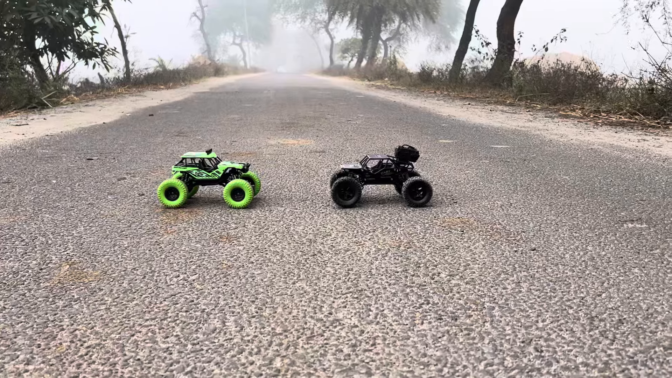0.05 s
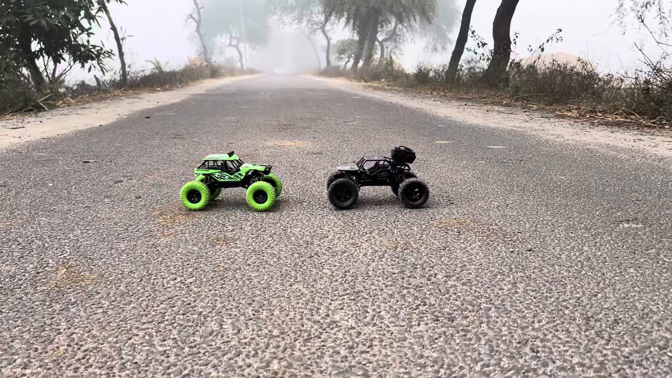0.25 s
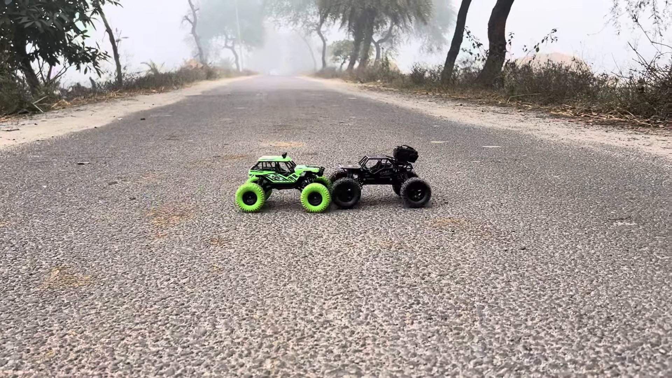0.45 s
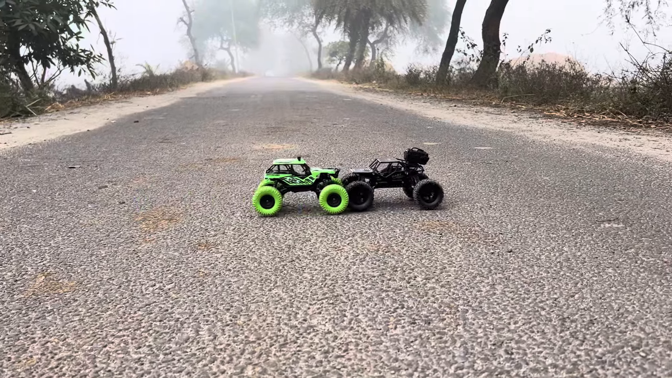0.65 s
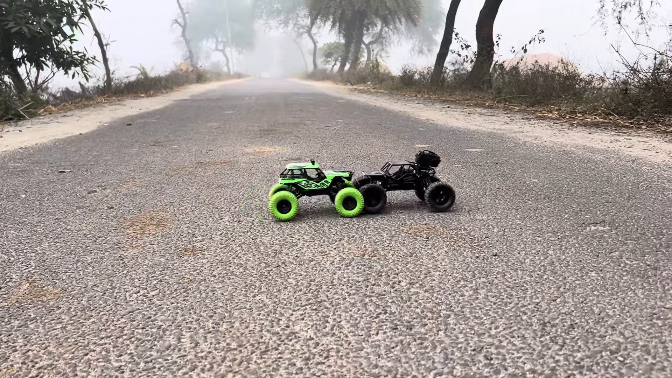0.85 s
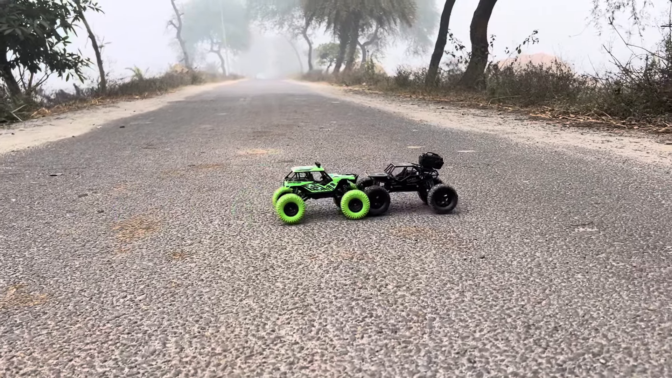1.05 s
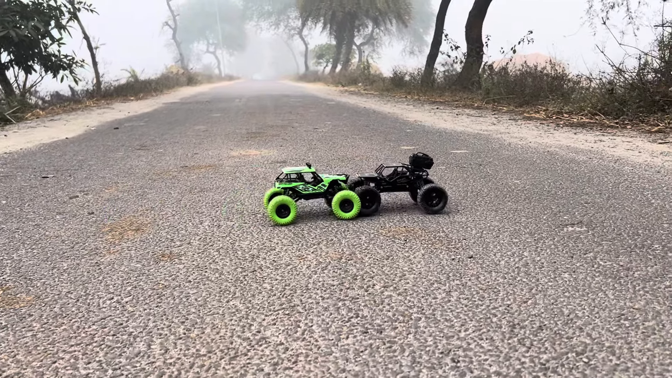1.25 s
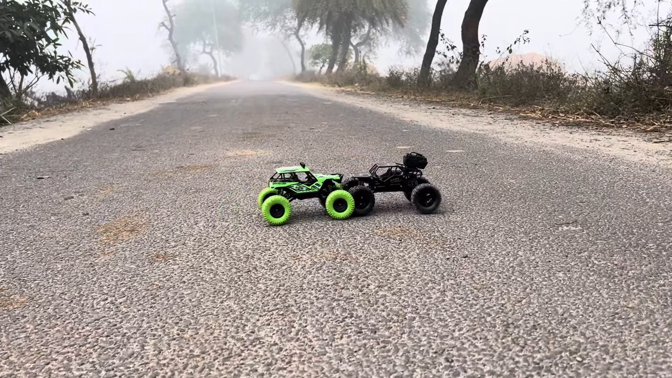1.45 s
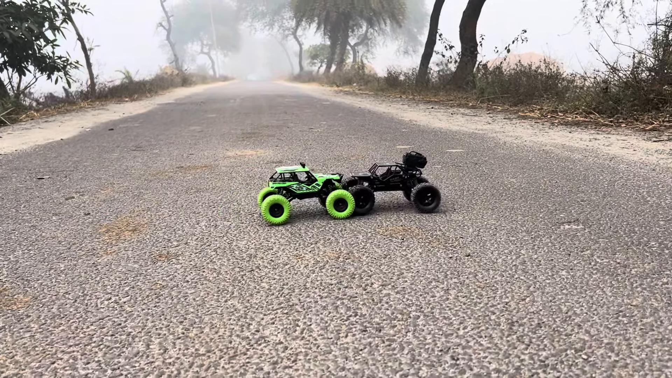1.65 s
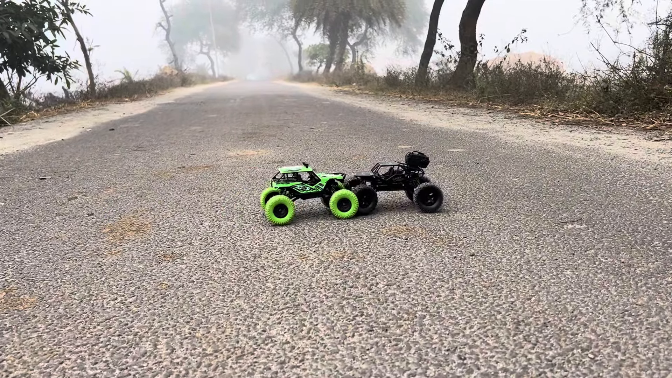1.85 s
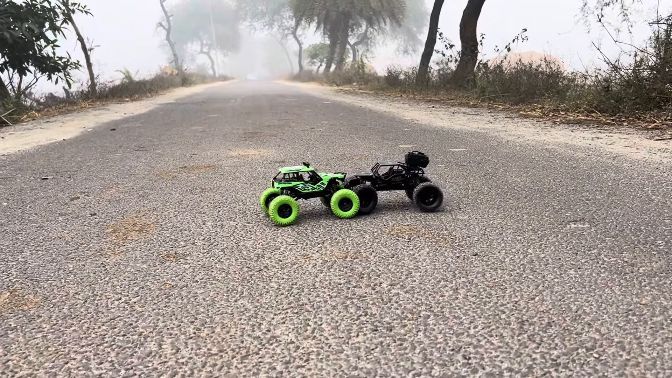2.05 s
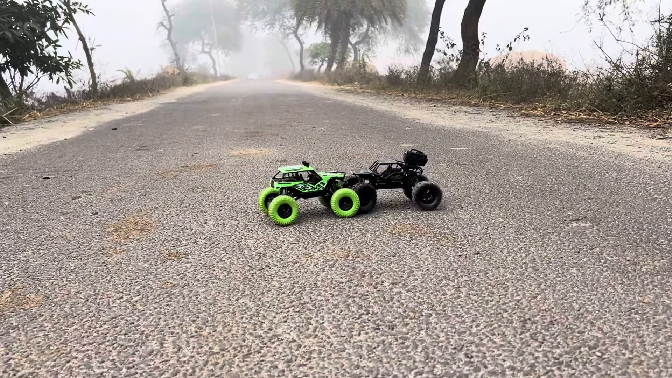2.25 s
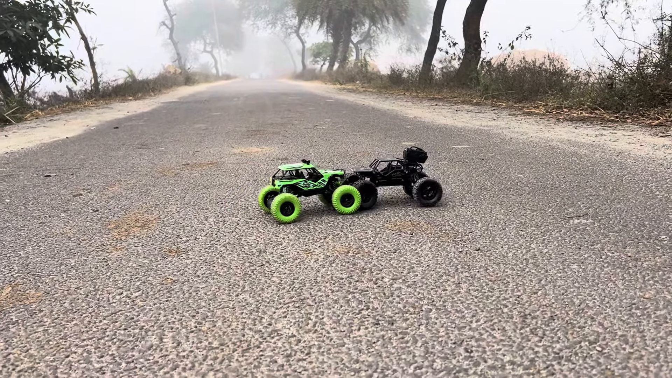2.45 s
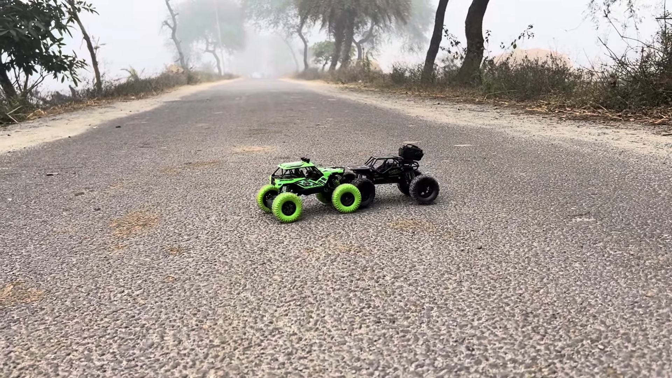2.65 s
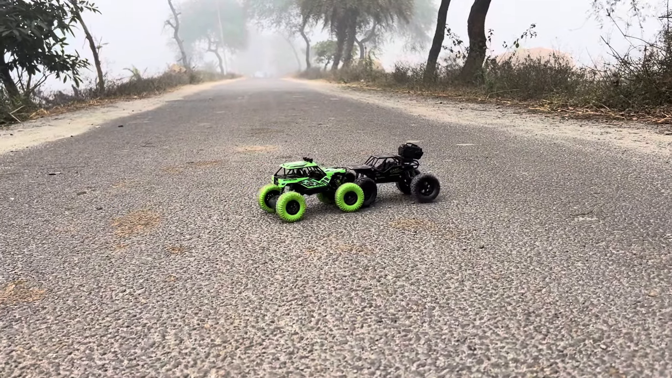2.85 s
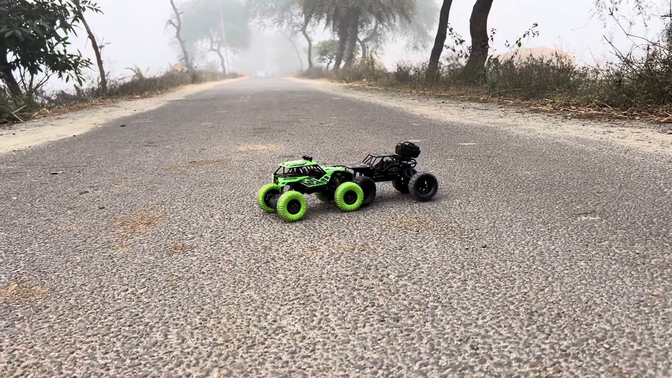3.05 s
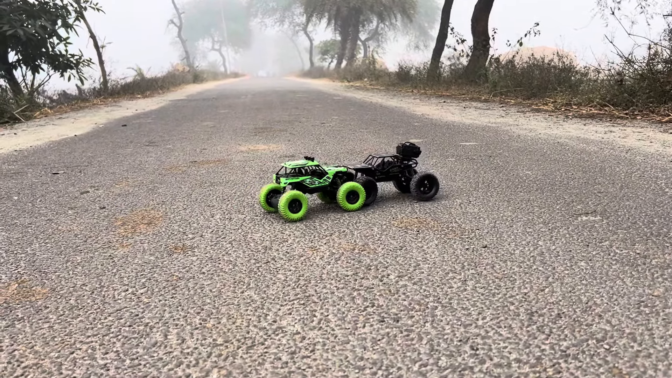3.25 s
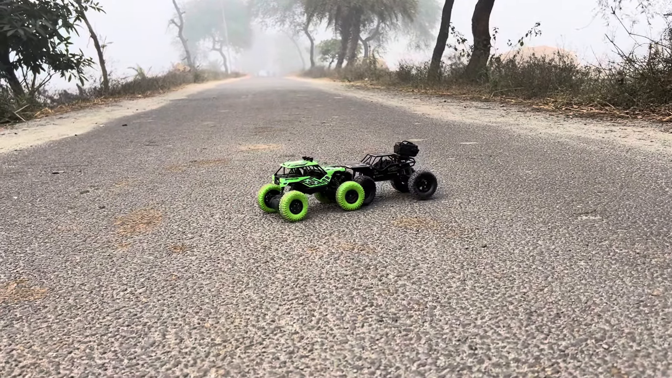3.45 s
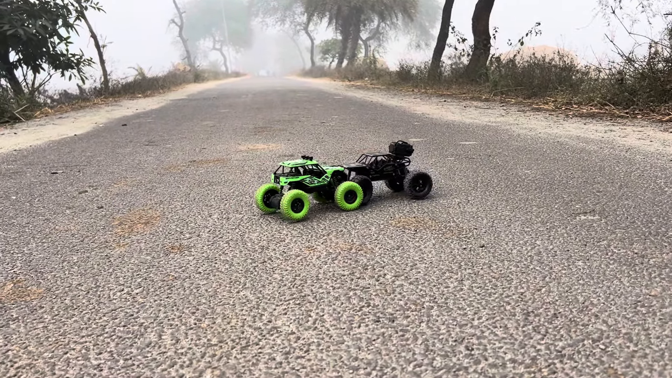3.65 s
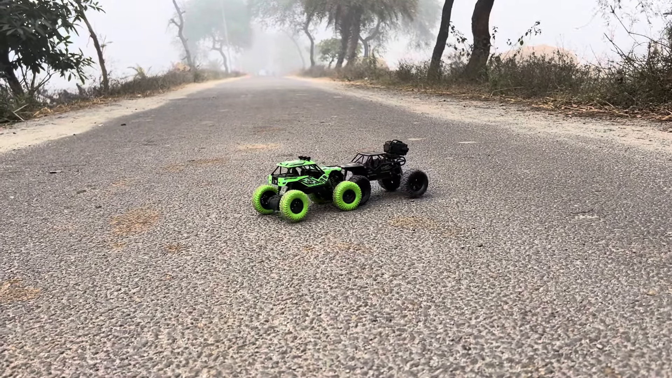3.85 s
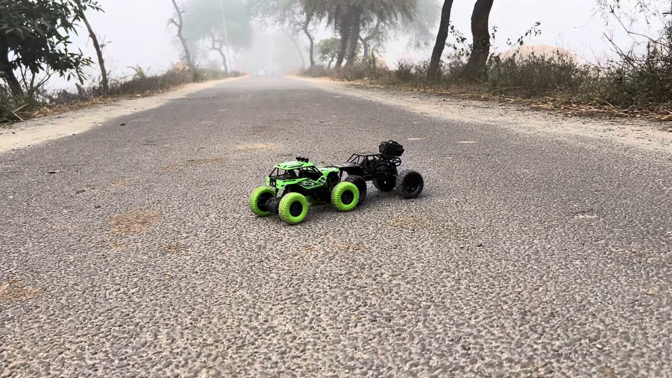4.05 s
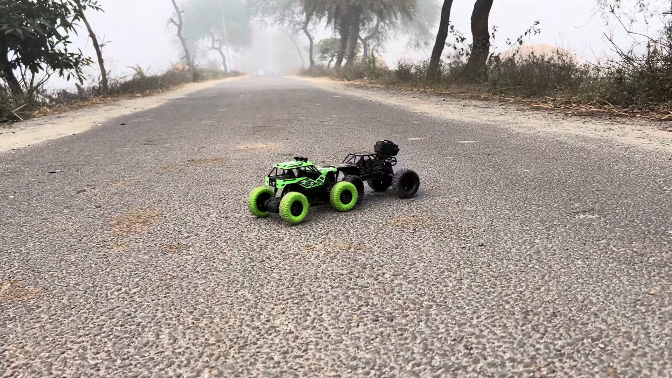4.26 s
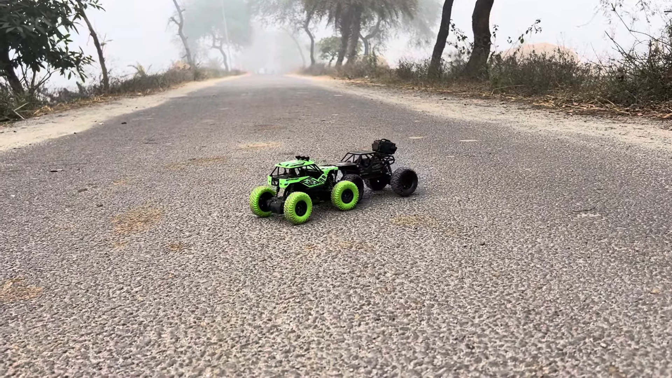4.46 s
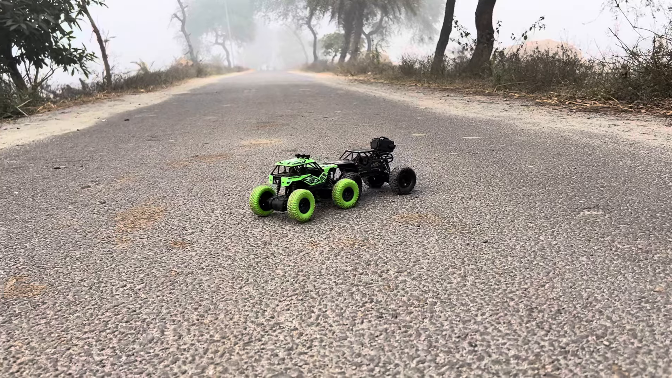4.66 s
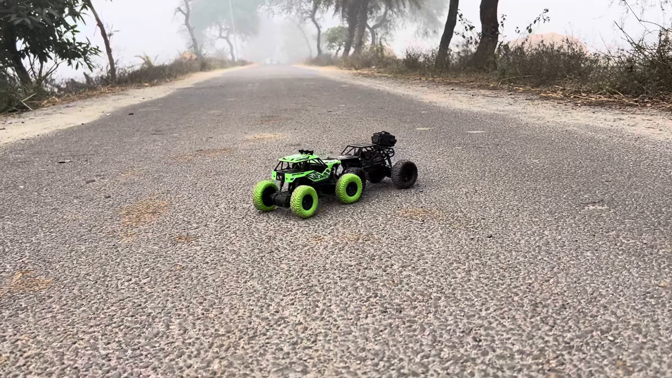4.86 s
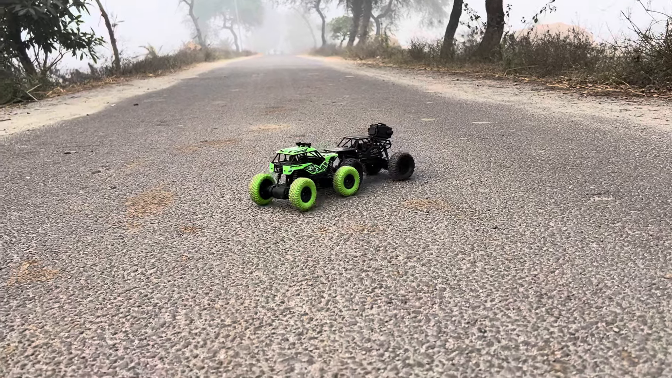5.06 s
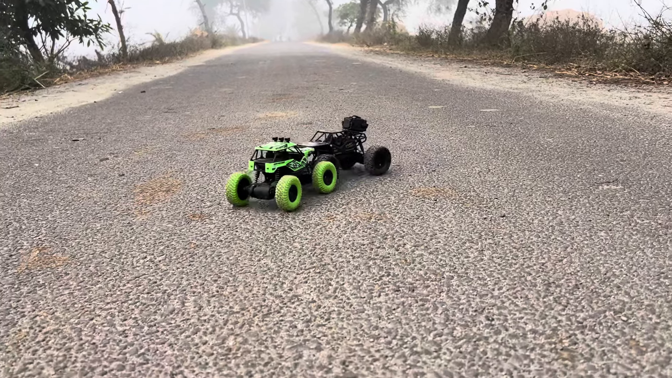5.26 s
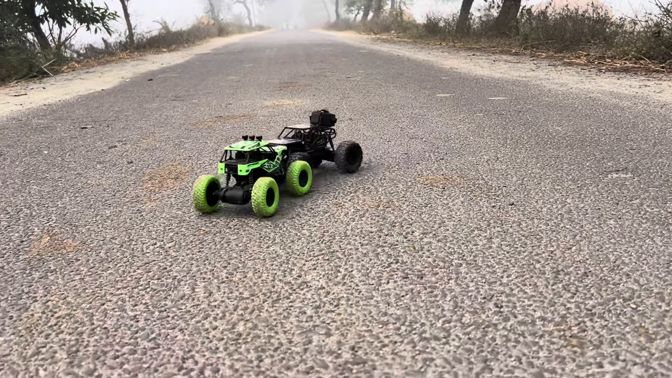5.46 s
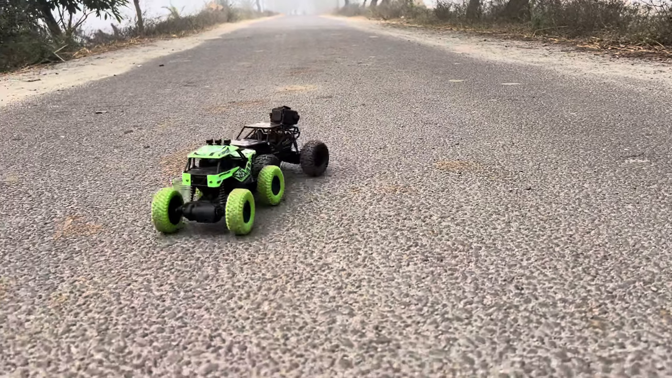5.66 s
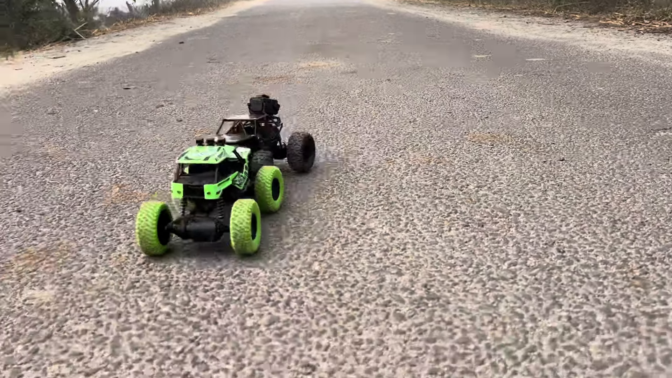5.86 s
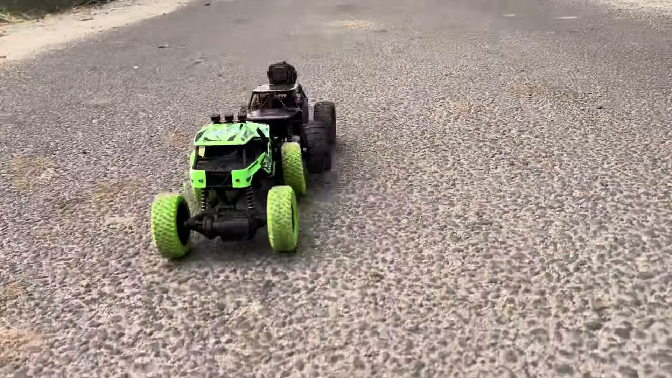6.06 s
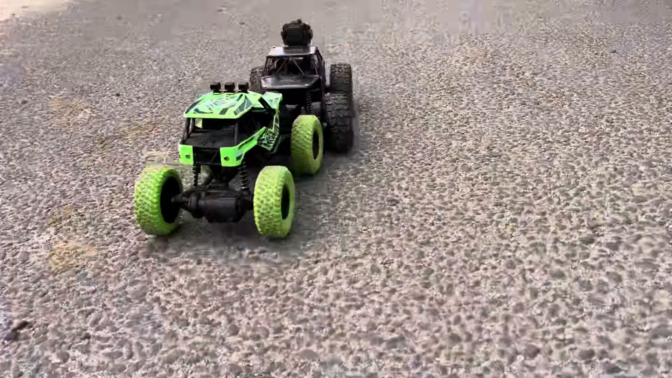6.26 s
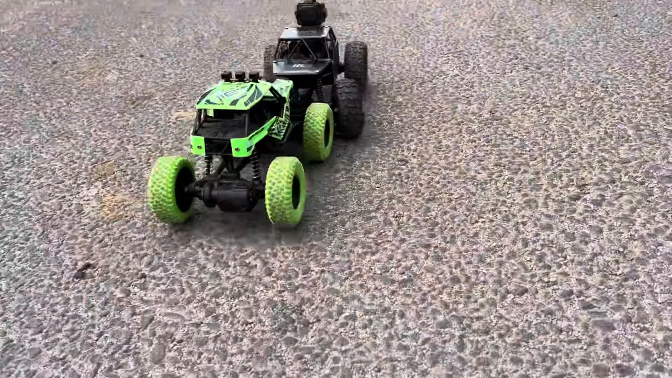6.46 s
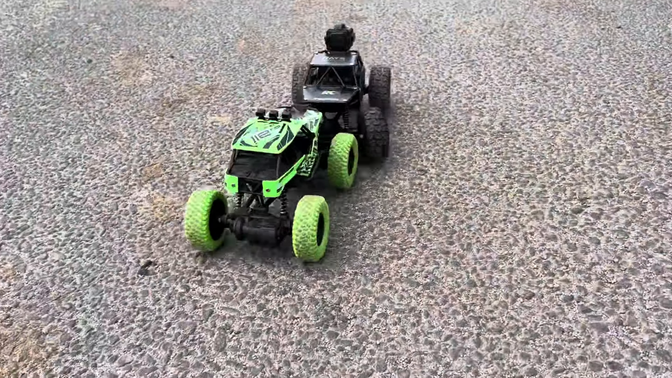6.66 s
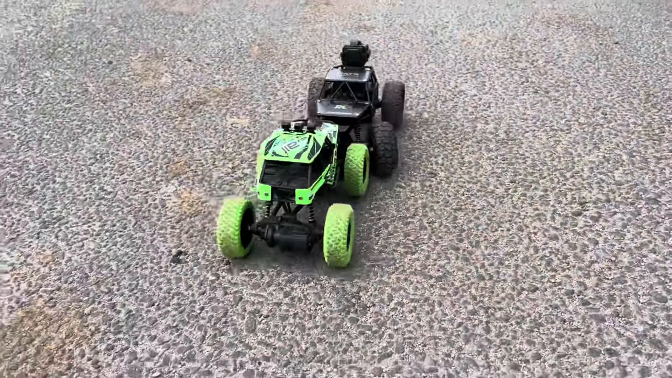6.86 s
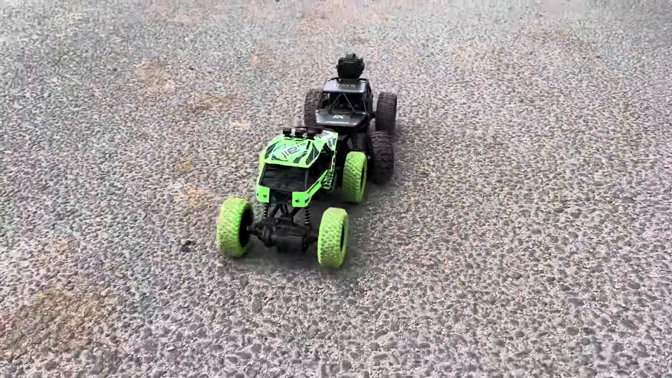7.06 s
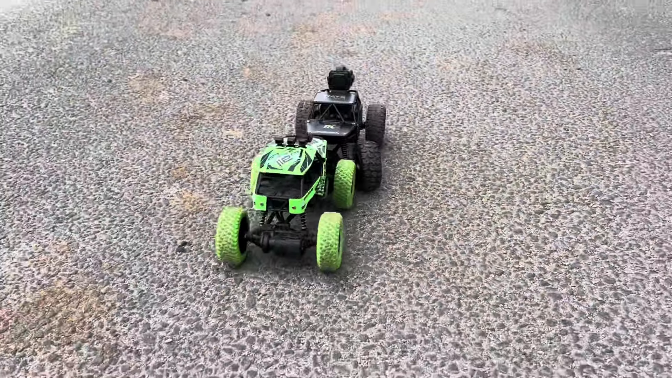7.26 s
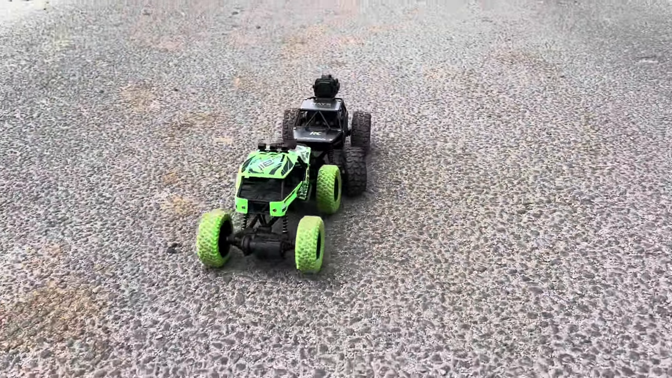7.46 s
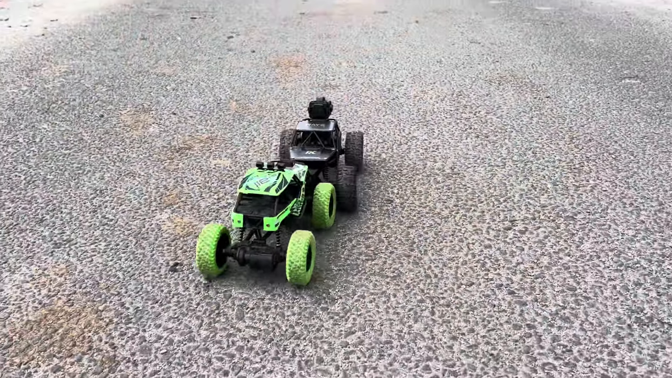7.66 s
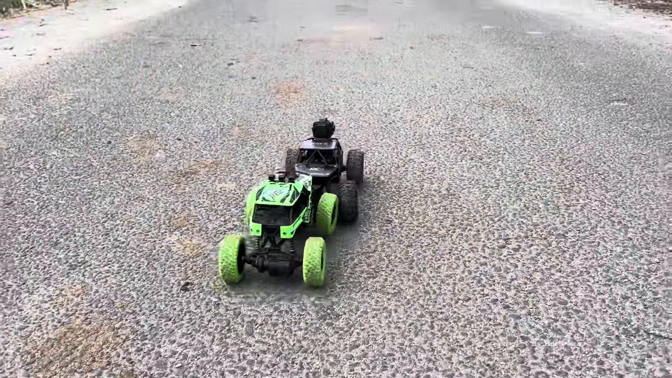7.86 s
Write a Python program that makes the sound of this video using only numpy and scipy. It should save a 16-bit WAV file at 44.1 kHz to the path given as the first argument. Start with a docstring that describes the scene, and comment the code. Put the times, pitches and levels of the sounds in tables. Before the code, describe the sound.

Rough plastic gear whir and fast grinding tyre stutter from two stalled toy cars, growing louder and closer, with hollow knocks and one hard popping bump.

```python
"""Two toy remote-control cars shove each other on coarse asphalt in open air, close to a hand-held phone.
Gears whirr as rough noise, coloured by the resonances of the plastic shells, with fuzzy whines on top.
The stalled tyres slip lug by lug about 19 times a second: short bursts of grit, with stones cracking out.
Bumpers and axles knock as sagging tones with puffs of noise, and one hard bump pops into a thud.
A low rumble of air and handling, made of deep noise, swells underneath."""
import sys
import numpy as np
from scipy import signal
from scipy.fft import rfft, irfft, next_fast_len
from scipy.io import wavfile
from scipy.ndimage import uniform_filter1d, map_coordinates

SR = 44100
rng = np.random.default_rng(int(sys.argv[2]) if len(sys.argv) > 2 else 0)


def to_wav(sig):
    """Store sig (one row per channel, or 1-D mono) as 16-bit WAV at the path in sys.argv[1].

    Samples outside -1..1 are clipped; the rate is SR.
    """
    pcm = np.clip(np.atleast_2d(sig), -1, 1) * 32767
    pcm = np.round(pcm).astype(np.int16)
    wavfile.write(sys.argv[1], SR, pcm.T)  # frames by channels


N = 348831  # length [samples]

# colour of the air noise before it is evened out: (frequency [Hz], level [dB])
AIR_COLOUR = [(12, -48), (25, -27), (38, -10), (55, 2.5), (80, -1.5), (130, -11), (220, -23), (500, -64)]
# the rumble sits higher while the phone is swung round: (time [s], share of pitch)
AIR_PITCH = [(5.4, 0.97), (5.7, 1.25), (7.3, 1.3), (7.5, 1.03)]
# swells of wind and handling: (time of peak [s], level [dB], length between the -5.8 dB points [s])
BUFFETS = [(0.15, -46, 0.17), (2.95, -49, 0.28), (3.8, -55, 1), (5.177, -41.5, 0.25), (5.766, -50, 0.4),
           (6.21, -46, 0.071), (6.62, -45.5, 0.27), (6.864, -37.5, 0.17), (7.207, -48, 0.46),
           (7.642, -45, 0.26), (7.814, -34, 0.047)]
# blows of bumpers and axles: (time [s], starting level [dB], pitch [Hz], time to fall 60 dB [s])
KNOCKS = [(0.061, -42, 1310, 0.055), (0.062, -44, 1810, 0.045), (.129, -47, 2800, 0.06),
          (.435, -33, 694, 0.02), (.441, -32, 1050, 0.02), (2.538, -31, 920, 0.025),
          (2.698, -32, 875, 0.04), (2.817, -29, 895, 0.03), (5.126, -30, 840, 0.051),
          (5.272, -32, 1100, 0.035), (5.468, -29, 904, 0.044), (5.632, -26, 835, 0.041),
          (5.792, -24.5, 900, 0.037), (5.993, -26, 1000, 0.033), (6.029, -24.5, 1077, 0.072),
          (6.722, -23, 450, 0.03), (6.725, -18, 680, 0.031), (6.732, -18, 640, 0.025),
          (6.737, -27, 790, 0.018), (6.739, -23, 500, 0.027), (7.145, -26, 600, 0.03),
          (7.149, -20, 950, 0.025), (7.154, -26, 1600, 0.05), (7.163, -22, 1510, 0.037),
          (7.166, -19, 486, 0.043), (7.172, -22, 1000, 0.036), (7.176, -23, 1530, 0.046),
          (7.301, -21, 1490, 0.07)]
# loudness of the gear trains: (time [s], level [dB])
GEAR_LEVEL = [(.135, -43), (.45, -34.5), (1, -38.5), (1.22, -39.5), (1.85, -38.5), (3, -37), (4.5, -39.5),
              (4.8, -37.5), (4.95, -38), (5.2, -32), (5.94, -29.5), (6.1, -31), (6.45, -33), (6.8, -32),
              (7.05, -36), (7.3, -27), (7.4, -33), (7.91, -35.5)]
# tone against the middle band: (time [s], treble [dB], bass [dB])
TONE = [(.11, -15, 13), (.135, -14.5, -8), (.3, 2, -5.5), (.45, -6, -5), (1.5, -6.5, -3.5), (2.3, -4, -3),
        (2.45, -2.5, 1), (3.05, -4.5, 2), (3.4, -4.5, -2.5), (4.4, -2.5, 0), (5, -7.5, -4.5),
        (5.7, -1.5, 0.5), (6.45, 1, 3), (7.3, -3, -1), (7.91, -3.5, -2.5)]
# narrow gear whines: (start [s], end [s], pitch [Hz], width [Hz], level against the gears [dB])
WHINES = [(0.19, 0.55, 11900, 2200, -10), (5.03, 5.9, 4700, 380, -10), (5.02, 6.4, 3080, 220, -9.5),
          (5.6, 5.95, 6600, 360, -8.5), (5.399, 5.95, 12000, 600, -13.5)]
# whine pitch as the cars take up the load and gather speed: (time [s], share of pitch)
WHINE_SPEED = [(5.1, 1.045), (5.3, 0.97), (5.45, 0.99), (5.85, 1.026)]
# resonances of the plastic shells heard from the side: (frequency [Hz], width [Hz], level [dB])
SHELL_SIDE = [(866, 56, 8), (1170, 226, 9), (1373, 100, 12), (1694, 220, 10.5), (2024, 170, 13),
              (2372, 39, 9), (2723, 110, 6.5), (3060, 500, 8.5), (3610, 790, 10), (4100, 490, 4),
              (4700, 56, 7), (6000, 115, 5.5), (6490, 440, 3)]
# the same heard from the front: (frequency [Hz], width [Hz], level [dB])
SHELL_FRONT = [(618, 100, 2.6), (1050, 340, 4.7), (1360, 370, 7.2), (1793, 240, 9.6), (2480, 260, 6.8),
               (3250, 810, 6.5), (4470, 1200, 2.9), (5540, 1500, 1.8), (6230, 260, 1.9)]
# the cars swing round to face the microphone: (time [s], share of the front)
SWING = [(4.95, 0.25), (5.2, 0.81)]
# broad colour of the shells under their resonances: (frequency [Hz], level [dB])
SHELL_COLOUR = [(100, -18.5), (300, -11.5), (2300, -12), (5100, -11), (7000, -8), (10000, -9.5),
                (13000, -12), (16000, -12)]
# tyre lugs slipping: (time of peak [s], level [dB], length between the -6.1 dB points [ms])
SLIPS = [(0.378, -34.5, 26), (0.44, -29.0, 36), (0.482, -26.5, 9.6), (0.519, -30.5, 17), (0.578, -28, 15),
         (0.619, -29, 14), (0.651, -31.5, 25), (0.699, -33, 21), (0.753, -29, 22), (0.795, -33.5, 14),
         (0.86, -28, 12), (0.897, -28.5, 18), (0.944, -35.5, 44), (0.99, -27, 21), (1.045, -27.5, 11),
         (1.092, -30.5, 28), (1.134, -31, 26), (1.181, -32.5, 32), (1.338, -31, 24), (1.388, -30.5, 31),
         (1.469, -35.5, 33), (1.508, -31, 38), (1.547, -32, 10), (1.585, -30.5, 16), (1.625, -35, 11),
         (1.702, -32, 14), (1.741, -32.5, 21), (1.774, -33.5, 22), (1.82, -26, 12), (1.862, -30, 26),
         (1.911, -26.5, 15), (1.961, -29, 21), (2.011, -26, 13.5), (2.068, -30, 32), (2.124, -26, 18),
         (2.173, -30, 25), (2.23, -28.5, 19), (2.273, -28.5, 20), (2.323, -27, 15), (2.382, -29.5, 27),
         (2.433, -27, 16), (2.486, -29, 21), (2.547, -25, 14), (2.607, -25, 13), (2.672, -25, 18),
         (2.724, -29, 27), (2.787, -29, 20), (2.838, -26, 19), (2.885, -29.5, 27), (2.949, -26.5, 15),
         (3.007, -26.5, 23), (3.058, -30.5, 35), (3.147, -29.5, 13), (3.192, -28.5, 14), (3.246, -30.5, 16),
         (3.339, -25.5, 14), (3.381, -30.5, 26), (3.433, -27.5, 19), (3.488, -27, 15), (3.537, -26.5, 21),
         (3.597, -25, 12), (3.661, -27, 17), (3.725, -24.5, 16), (3.765, -28.5, 15.4), (3.805, -30, 14),
         (3.847, -31, 46), (3.905, -28.5, 26), (3.96, -27.5, 21), (4.02, -27.5, 27), (4.079, -27.5, 29),
         (4.125, -27.5, 23), (4.174, -27, 21), (4.226, -29, 30), (4.293, -31.5, 27), (4.34, -30, 23),
         (4.382, -33.5, 45), (4.427, -31.5, 20), (4.473, -31, 22), (4.539, -26.5, 15), (4.595, -25, 16),
         (4.657, -28.5, 22), (4.709, -27.5, 21), (4.776, -32.5, 59), (4.89, -27, 16), (4.986, -36, 13),
         (5.036, -31.5, 15), (5.941, -26.5, 11), (6.031, -24.5, 40), (6.076, -22, 15), (6.11, -26.5, 24),
         (6.158, -25, 19), (6.205, -26, 38), (6.261, -22, 18), (6.31, -20.5, 17), (6.368, -22.5, 19),
         (6.419, -25.5, 35), (6.494, -23, 21), (6.542, -28.5, 19), (6.585, -21, 12), (6.64, -24.5, 27),
         (6.701, -23, 16), (6.752, -22.5, 20), (6.81, -24, 12), (6.847, -28, 47), (6.892, -25, 13),
         (6.933, -26, 20), (6.988, -26, 52), (7.038, -26.5, 32), (7.1, -21.5, 22), (7.166, -21.5, 24),
         (7.22, -23, 17), (7.271, -23.0, 31), (7.365, -24.5, 16), (7.41, -22, 17), (7.458, -25, 17),
         (7.508, -23, 13.5), (7.563, -22, 16), (7.612, -25, 22), (7.658, -25, 31), (7.708, -25.5, 19),
         (7.765, -30, 53), (7.834, -28, 21), (7.875, -31, 37)]
# single stones cracking out from under a lug: (time [s], level [dB], before a fixed 2.5 dB cut)
STONES = [(3.485, -17), (4.589, -22), (4.8873, -18.5), (6.3617, -10), (6.3858, -14), (6.4852, -11.5),
          (6.5816, -17), (6.634, -11), (6.6997, -17), (6.8038, -9.5), (7.0688, -19), (7.6056, -24)]
# microphone pair: (frequency [Hz], likeness [0-1], left minus right [dB], left lead [rad], less below 600 Hz)
PORTS = [(60, .95, .1, 0), (150, .88, 1, .3), (600, .92, 2, .3), (1250, .8, 6, .4), (1550, .35, 1, 3),
         (1800, .93, 0, 6.3), (2600, .75, 0, 6.5), (3300, .8, -.5, 7.4), (4100, .55, 4, 7.5),
         (4700, .7, 4, 5.9), (5500, .45, 5, 5.5), (6300, .8, 3, 6.3), (7500, .85, 0, 6),
         (8500, .72, 0, 4.7), (9250, .96, 0, 3.3), (10600, .98, 0, 3), (11300, .72, 0, 1.9),
         (11900, .9, 0, .2), (13700, .98, 0, -.1), (14400, .65, 0, -1.5), (15000, .85, 0, -2.9),
         (15900, .97, 0, -3.15)]

AIR_DB = -55  # steady rumble of air, before its random lumps
START_S, BITE_S, IDLE_DB = 0.12, 0.017, -25.5  # motors switch on, how fast gears bite, change before that
# the drive turns round: the gears slow, run slack and catch again
REVERSE_S, SLOW_S, CATCH_S, SLACK_DB = 5.014, 0.07, 0.016, -10
SLACK_BASS = 1  # share of the slack that the bass does not follow
WAVER, WAVER_HZ = .012, 25  # random wander of the whines: share of pitch, changes a second
SAG, SAG_HZ = 0.046, 23.98  # the whines slide down and jump back: share of pitch, slides a second before drift
RISE_SHARE = 0.43  # part of a slip's length spent loading up
RISE_EDGE, FALL_EDGE = 3.2, 1.9  # squareness of a slip's start and end
BOOM_LAG_S = 0.0033  # the shell's low modes build up later than the scrape that drives them
STONE_T60_S = 0.026  # time for a stone's crack to fall 60 dB
POP_S, POP_HZ, POP_END_HZ, POP_SAG_S = 6.762, 1810, 105, 0.00295  # time, first and last pitch, speed of fall
POP_DB, POP_T60_S, THUD_DB, THUD_T60_S = -9, 0.011, -25, 0.1  # starting levels and times to fall 60 dB
TOP_HZ = 15800  # nothing is kept from here up


def amp(db):
    """Decibels to amplitude."""
    return 10 ** (np.asarray(db) / 20)


def unit(x):
    """x scaled to an average (RMS) strength of 1."""
    return x / np.sqrt(np.mean(x ** 2) + 1e-20)


def along(points, hz, count=1):
    """Column of a frequency table, read on a log axis."""
    columns = np.transpose(points)
    return np.interp(np.log(hz + 1), np.log(columns[0] + 1), columns[count])


def curves(rows):
    """One value per sample for each column after the time."""
    s, *columns = np.transpose(rows)
    return [np.interp(np.arange(N) / SR, s, column) for column in columns]


def wobble(rate):
    """A smooth random curve with rate knots a second."""
    knots = rng.standard_normal(int(N * rate / SR) + 4)
    return map_coordinates(knots, [np.arange(N) * rate / SR])


def filtered(x, response):
    """x with each frequency scaled and shifted by a complex response."""
    m = next_fast_len(N + 8192)
    return irfft(rfft(x, m) * response(np.fft.rfftfreq(m, 1 / SR)), m)[..., :N]


def split(x, hz):
    """Low and high part of x."""
    low = filtered(x, lambda f: 1 / (1 + (f / hz) ** 4))
    return low, x - low


def air():
    """Moving air and handling give a low lumpy rumble that swells with each buffet."""
    noise = filtered(rng.standard_normal((2, N)), lambda f: amp(along(AIR_COLOUR, f)))
    strength = np.sqrt(np.abs(uniform_filter1d(unit(noise) ** 2, size=SR // 25)))
    noise = noise / (.2 + strength)  # evened out, so that the swells set the size
    low = split(noise, 260)[0]
    read = np.cumsum(curves(AIR_PITCH)[0])  # reading faster raises the pitch
    rumble = np.array([np.interp(read, np.arange(N), row, period=N) for row in low])
    t = np.arange(0, N / SR, .005)
    power = amp(AIR_DB) ** 2
    for s, db, length in BUFFETS:
        power = power + amp(db - 5.8 * np.abs(2 * (t - s) / length) ** 3) ** 2
    swell = curves(np.c_[t, np.sqrt(power)])[0]
    return swell * amp(2.6 * wobble(14)) * unit(rumble)


def knocks():
    """A hollow blow: a sagging tone with a puff of noise around its pitch."""
    out, t = np.zeros((2, N + SR)), np.arange(SR // 10) / SR
    for s, db, hz, t60 in KNOCKS:
        # the pitch sags from 1.14 to 0.7 times the table's
        tone = np.sin(2 * np.pi * hz * (.7 * t + 0.302 * 0.0121 * (1 - np.exp(-t / 0.0083))))
        band = signal.iirpeak(hz, 0.9, SR)
        puff = signal.lfilter(*band, rng.standard_normal((2, len(t))))
        puff = signal.lfilter(*band, puff)
        size = amp(db - 60 * t / t60) * (1 - np.exp(-t / 0.00062))
        out[:, round(s * SR):][:, :len(t)] += size * (0.7 * tone + 0.67 * unit(puff))
    return out[:, :N]


def mode(f, hz, width):
    """A resonance of given pitch and width, with peak gain 1."""
    return 1j * f * width / (hz * hz - f * f + 1j * f * width)


def shell(x):
    """The plastic shells colour x broadly, boost it at their resonances, and turn towards the microphone."""
    def coloured(modes):
        def response(f):
            power = sum(np.abs(amp(db) * mode(f, hz, width) ** 2) ** 2 for hz, width, db in modes)
            return amp(along(SHELL_COLOUR, f)) * np.sqrt(1 + power)
        return unit(filtered(x, response))
    front = np.clip(curves(SWING)[0], 0, 1)
    return (1 - front) * coloured(SHELL_SIDE) + front * coloured(SHELL_FRONT)


def gritty(rate, spread_db, click_hz, clicks):
    """Noise of randomly varying strength, with a dense rattle of single hard contacts on top."""
    hits = (rng.random(N) < click_hz / SR) * rng.standard_normal((2, N))
    grains = rng.standard_normal((2, N)) + clicks * unit(hits)
    return unit(amp(spread_db * wobble(rate)) * grains)


def patchy(x, patchy_db):
    """Random patches of gain over time and frequency."""
    z = signal.stft(x, nperseg=512)[2]
    field = uniform_filter1d(rng.standard_normal(z.shape[1:]), size=3, axis=0)
    field = uniform_filter1d(field, size=4, axis=1)
    return signal.istft(z * amp(patchy_db * unit(field)), nperseg=512)[1][:, :N]


def toned(x, treble_db, bass_db):
    """x with moving gains on its top and bottom bands."""
    rest, high = split(x, 4220)
    low, mid = split(rest, 1430)
    return amp(bass_db) * low + mid + amp(treble_db) * high


def drive():
    """Level, treble and bass of the drive in dB, with switch-on and the slack at the reversal."""
    t = np.arange(N) / SR
    idle_db = IDLE_DB * np.clip((START_S + BITE_S - t) / BITE_S, 0, 1)
    slack_time = np.where(t < REVERSE_S, SLOW_S, CATCH_S)
    slack_db = SLACK_DB * np.exp(-((t - REVERSE_S) / slack_time) ** 2)
    treble_db, bass_db = curves(TONE)
    level_db = curves(GEAR_LEVEL)[0] + idle_db + slack_db
    return level_db, treble_db, bass_db - SLACK_BASS * slack_db


def gears():
    """Rough tooth contacts excite the shells, and the level flutters at random."""
    level_db, treble_db, bass_db = drive()
    teeth = shell(patchy(gritty(900, 1.4, click_hz=1494, clicks=0.83), patchy_db=3.0))
    return amp(level_db + 1.33 * wobble(70)) * (toned(teeth, treble_db, bass_db) + whines())


def whines():
    """Each whine is a tone smeared by slow noise into a fuzzy band that flutters."""
    out, flutter_db = np.zeros((2, N)), 1.5 * wobble(50)
    slides = SAG_HZ * np.cumsum(amp(2.5 * wobble(9))) / SR  # the slides come a little unevenly
    speed = curves(WHINE_SPEED)[0] + WAVER * wobble(WAVER_HZ)
    speed = speed - SAG * signal.sawtooth(2 * np.pi * slides)
    for start, end, hz, width, db in WHINES:
        at = slice(round(start * SR), round(end * SR))
        n = at.stop - at.start
        slow = signal.butter(2, width / SR)
        smear = unit(signal.lfilter(*slow, rng.standard_normal((2, 2, n))))
        turn = 2 * np.pi * hz * np.cumsum(speed[at]) / SR
        fuzzy = smear[0] * np.cos(turn) + smear[1] * np.sin(turn)
        out[:, at] += amp(db + flutter_db[at]) * signal.windows.tukey(n, .16) * fuzzy
    return out


def slips():
    """Power of the body and the hiss as each lug loads up and lets go."""
    body, hiss = np.zeros(N + SR), np.zeros(N + SR)
    half = 2600  # samples kept on each side of a peak
    t_ms = np.arange(-half, half) / SR * 1000
    for (s, db, length), bright in zip(SLIPS, rng.standard_normal(len(SLIPS))):
        rise, fall = RISE_SHARE * length, (1 - RISE_SHARE) * length
        loading, letting_go = np.abs(t_ms / rise) ** RISE_EDGE, np.abs(t_ms / fall) ** FALL_EDGE
        shape_db = -6.1 * np.where(t_ms < 0, loading, letting_go)
        at = slice(round(s * SR) - half, round(s * SR) + half)
        body[at] += amp(db + shape_db) ** 2
        hiss[at] += amp(db + 2.5 + 4.8 * shape_db + 1.15 * bright) ** 2  # shorter than the body
    return body[:N], hiss[:N]


def stones():
    """Power of single stones cracking out: a quick start and a short decay."""
    starts = [round(s * SR) for s, db in STONES]
    hits = np.bincount(starts, [amp(db - 2.5) ** 2 for s, db in STONES], N)
    n = np.arange(SR // 20)
    decay = amp(-60 * n / SR / STONE_T60_S) ** 2 * np.tanh(n / 40)
    return np.abs(signal.fftconvolve(hits, decay)[:N])


def tyres():
    """Slipping lugs and cracking stones send short bursts of grit through the shells."""
    level_db, treble_db, bass_db = drive()
    body, hiss = slips()
    cracks = stones()
    grit = shell(patchy(gritty(800, 2.2, click_hz=3000, clicks=.45), patchy_db=1.52))
    facing_db = 0.45 * curves(SWING)[0]  # the treads hiss more once they face the microphone
    low, high = split(toned(grit, treble_db + facing_db, bass_db - 3.5), 5550)
    boom, scrape = split(low, 2440)
    snaps = amp(2.3 * np.tanh(wobble(260)))  # quick random flicker inside each hiss
    late = np.roll(body, round(BOOM_LAG_S * SR))
    out = np.sqrt(late) * boom
    out = out + np.sqrt(body + 0.15 * cracks) * scrape
    return out + np.sqrt(hiss * snaps ** 2 + cracks) * high


def pop():
    """A hard bump: one tone falls steeply, loud and brief at the top, soft and longer at the bottom."""
    out, t = np.zeros(N), np.arange(SR // 10) / SR
    turns = POP_END_HZ * t + (POP_HZ - POP_END_HZ) * POP_SAG_S * (1 - np.exp(-t / POP_SAG_S))
    size = amp(POP_DB - 60 * t / POP_T60_S) + amp(THUD_DB - 60 * t / THUD_T60_S)
    size = size * (1 - np.exp(-t / 0.00038))  # soft start
    out[round(POP_S * SR):][:len(t)] = size * np.sin(2 * np.pi * turns)
    return out * [[1], [.5]]


def scene():
    """Row 0 is the sound both ports share, row 1 the scattered part that reaches only the right port."""
    return air() + knocks() + gears() + tyres() + pop()


def record(dry):
    """Sharp peaks are softly rounded, and two microphone ports differ in level and phase."""
    def ports(f):
        alike = np.clip(along(PORTS, f), 0, 1)
        pan = amp(along(PORTS, f, count=2) / 2)  # half the difference on each side
        lead = np.exp(.5j * along(PORTS, f, count=3) * np.clip(f / 600, 0, 1))
        gains = np.array([pan * lead, alike / (pan * lead), np.sqrt(1 - alike ** 2) / pan])
        return gains * (f < TOP_HZ)
    rounded = dry / (1 + np.abs(dry / .4) ** 3) ** (1 / 3)  # never beyond 0.4
    left, shared, own = filtered(rounded[[0, 0, 1]], ports)
    return np.array([left, shared + own])


dry = scene()
out = record(dry)
to_wav(out)
```